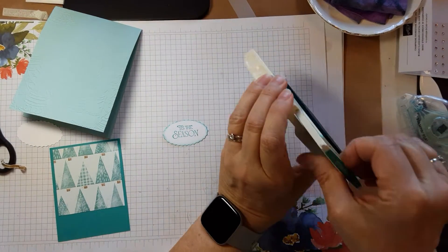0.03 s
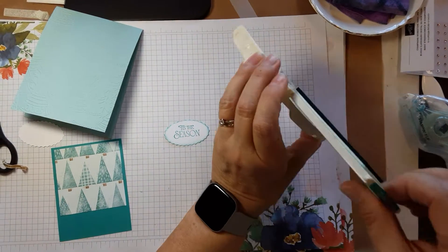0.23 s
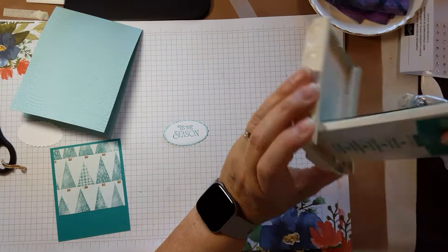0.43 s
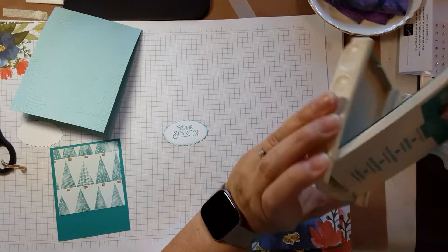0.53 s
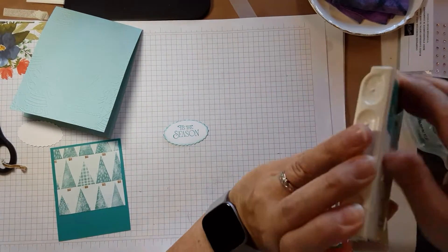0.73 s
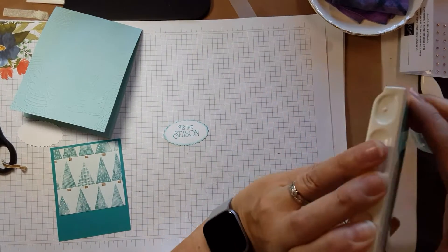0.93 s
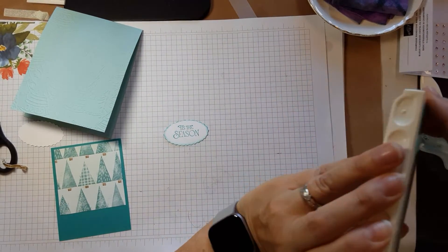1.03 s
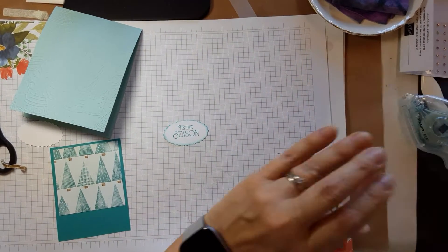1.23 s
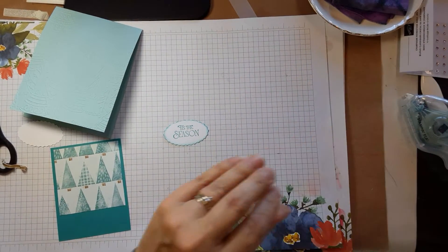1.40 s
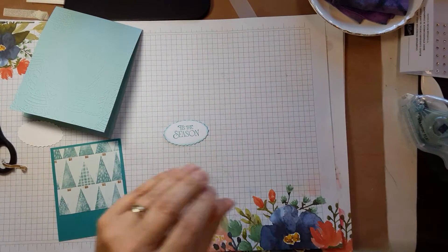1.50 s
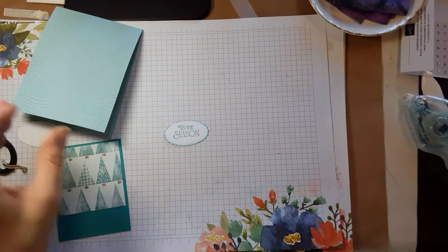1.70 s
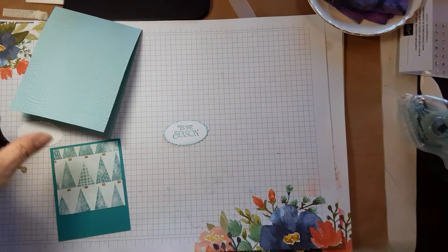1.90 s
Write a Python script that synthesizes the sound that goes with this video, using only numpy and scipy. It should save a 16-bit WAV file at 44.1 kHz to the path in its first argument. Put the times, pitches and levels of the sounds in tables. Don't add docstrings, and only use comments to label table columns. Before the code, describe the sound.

Plastic case clicking closed in hand, bright cracks close up, then a dull tabletop thud

```python
import sys
import numpy as np
from scipy import signal
from scipy.fft import rfft, irfft
from scipy.io import wavfile
from scipy.ndimage import uniform_filter1d

SR = 44100
rng = np.random.default_rng(int(sys.argv[2]) if len(sys.argv) > 2 else 0)


def to_wav(s):
    ch = np.atleast_2d(s).T
    pcm = np.round(np.clip(ch, -1, 1) * 32767)
    wavfile.write(sys.argv[1], SR, pcm.astype(np.int16))


def boost_factor(decibels):
    exponent = np.asarray(decibels, float) / 20
    return 10 ** exponent


N = 85995
LEAD = 4410


def read(points, hz):
    f, value = np.transpose(points)
    return np.interp(np.log(hz + 1), np.log(f + 1), value)


def add(mix, s, sound):
    part = mix[LEAD + round(s * SR):][:len(sound)]
    part += sound[:len(part)]


def hiss(points):
    hz = np.fft.rfftfreq(N, 1 / SR)
    x = irfft(rfft(rng.standard_normal(N)) * boost_factor(read(points, hz)), N)
    return x / x.std()


def ring(modes, t, spread, spread_db):
    luck = 2 * rng.random((len(modes), 2)) - 1
    out = 0
    for (hz, db, t60), (a, b) in zip(modes, luck):
        fade = boost_factor(db + spread_db * b - 60 * t / t60)
        out = out + fade * np.sin(2 * np.pi * hz * (1 + spread * a) * t)
    return out


# (frequency [Hz], level [dB])
PORT = [(200, -5), (900, 15), (3500, 2.5), (5500, 10.5), (6800, 2), (7800, -12.5), (9300, -15.5),
        (16000, -17)]
# (frequency [Hz], width [Hz], level [dB])
PORT_PEAKS = [(10590, 590, -4.5), (13500, 1800, -12)]


def colour(x, top_db, low_db):
    hz = abs(np.fft.fftfreq(4096, 1 / SR))
    gain = boost_factor(read(PORT, hz))
    gain = gain + sum(boost_factor(db) / (1 + (2 * (hz - f) / w) ** 2) for f, w, db in PORT_PEAKS)
    treble = top_db / (1 + (7500 / (hz + 1)) ** 8)
    bass = low_db / (1 + (hz / 1600) ** 4)
    gain = gain * boost_factor(treble + bass)
    taps = np.fft.ifft(np.exp(np.conj(signal.hilbert(np.log(gain))))).real[:1024]
    return signal.oaconvolve(x, taps)[:len(x)]


# (time [s], shell ring [dB], cavity ring [dB], wall ring [dB], crack [dB])
CASE_SNAPS = [(-.03, -36, -24, -34, -21.5), (.005, -66, -96, -67, -55), (0.0483, -46, -50.5, -42, -45),
              (0.0633, -53, -58, -46, -48), (0.1775, -35, -34.5, -43.5, -37), (0.193, -52, -53, -48, -39),
              (0.2009, -44, -24.5, -55.5, -39), (0.217, -22, -54, -18.5, -13),
              (0.2257, -28.5, -15.5, -29, -21.5), (.391, -43.5, -52.5, -64, -66),
              (0.3995, -36.5, -31, -58.5, -49), (0.4628, -30, -21.5, -29, -31),
              (0.477, -32.5, -53.5, -47, -57.5), (0.534, -44, -36, -70, -70),
              (.582, -55, -45.5, -69, -72.5), (.625, -49.5, -51, -68.5, -69),
              (0.657, -62.5, -43.5, -62.5, -68), (0.666, -55.5, -35.5, -62.5, -64.5),
              (0.6718, -41, -35, -39, -20), (.6738, -19, -15.5, -40.5, -29.5),
              (0.682, -27.5, -28.5, -17.5, -9), (.684, -20, -14, -24, -17.5),
              (0.6885, -38.5, -33, -31, -19.5), (.76, -37, -25, -41, -50),
              (0.8016, -22, -7.5, -17.5, -11.5), (0.8056, -35, -30, -15, -39.5),
              (1.122, -74, -76, -62, -55.5), (1.455, -74, -60.5, -89.5, -69.5),
              (1.542, -36.5, -41.5, -50.5, -43), (1.5802, -53, -41.5, -58.5, -37.5),
              (1.593, -62, -54, -72, -54), (1.607, -29.5, -25.5, -63, -39), (1.625, -46.5, -14, -20.5, -19),
              (1.8209, -70, -67, -78, -45)]
# (frequency [Hz], level [dB], t60 [s])
OPEN_MODES = [
    [(507, -6.5, 0.14), (650, -7, 0.14)],
    [(1046, -2, 0.029), (1360, -12.5, 0.049)],
    [(1910, -3.5, 0.086), (2215, 1, 0.035), (2950, -18, 0.013)],
]
HALF_MODES = [
    [(414.7, -3.5, .09), (470.5, -7, 0.025)],
    [(1020, -1, 0.082), (1420, -10.5, 0.11)],
    [(1830, 4, 0.016), (2150, 2, 0.028), (2520, 0, 0.0086), (3530, -1, 0.017)],
]
SHUT_MODES = [
    [(644, 0.66, 0.016), (750, -1.2, 0.041)],
    [(940, -5.5, 0.04), (1075, 0.5, 0.045), (1440, -7, 0.018), (1703, -8.5, 0.045)],
    [(2250, -9.5, 0.04), (3015, 2.5, 0.022), (3700, 3, 0.011), (4100, 8, 0.0071)],
]
LATCHED_MODES = [
    [(661, -8, 0.033), (776, 1.5, 0.034)],
    [(950, -10, 0.019), (1034, 1, 0.021), (1435, -8, 0.018), (1660, -6.5, 0.021)],
    [(2150, -1, 0.025), (2633, 0.68, 0.012), (4140, 1.7, 0.0049), (5174, 1.4, 0.0067)],
]
DOWN_MODES = [
    [(294, -3, 0.031), (516, 0, 0.0055)],
    [(726, 5, 0.0039), (1093, 2, 0.0093), (1490, -6, 0.013)],
    [(1877, 1, 0.028), (2320, 19, 0.0025), (3690, -9, 0.024), (3920, 5.5, 0.0018), (4630, 8, 0.0035)],
]
MOVES = [.43, .6, .676, .78, 1.5, 1.615]
CRACK_LOW = [-7, 0.5, -5.5, -8, -4, -2.5, -0.5]
PULSE_SHARP = [3.5, -6, -5.5, 8.5, 4, 10, -18]
CRACK_TOP = [-3.5, -14, -7.5, 7, 0, -7, 2.5]


def case():
    t = np.arange(round(.1 * SR)) / SR
    near = np.zeros(N + LEAD)
    sent = np.zeros((len(MOVES) + 1, N + LEAD))
    states = (OPEN_MODES, HALF_MODES, SHUT_MODES, LATCHED_MODES, DOWN_MODES)
    for s, shell_db, cavity_db, wall_db, crack_db in CASE_SNAPS:
        state = states[np.searchsorted([.43, .6, .78, 1.5], s)]
        place = np.searchsorted(MOVES, s)
        shell, cavity, wall = (-boost_factor(db) * ring(part, t, .008, 1) * np.minimum(t / 0.0008, 1)
                               for db, part in zip((shell_db, cavity_db, wall_db), state))
        held = shell * np.exp(-(t / .03) ** 2) + (cavity + wall) * np.exp(-(t / .015) ** 2)
        body = shell + boost_factor(-7) * cavity + wall

        grit = rng.standard_normal((len(t), 2))
        snap = grit[:, 0] * boost_factor(-60 * t / 0.0052)
        rattle = grit[:, 1] * boost_factor(-12 - 60 * t / 0.044)
        crackle = boost_factor(2.5) * (snap + rattle) * np.minimum(t / 0.000096, 1)
        click = 1. * (np.arange(len(t)) == 12)
        pulse = -colour(click, CRACK_TOP[place], CRACK_LOW[place])
        crack = colour(crackle, CRACK_TOP[place], CRACK_LOW[place])
        crack = crack + boost_factor(2 + PULSE_SHARP[place]) * pulse

        add(near, s, held + boost_factor(crack_db) * crack)
        add(sent[place], s, boost_factor(7.5) * body * np.exp(-t / .002) + boost_factor(crack_db + 13.5) * pulse)
    small = signal.butter(3, 300, "high", fs=SR, output="sos")
    return signal.sosfilt(small, near), signal.sosfilt(small, sent)


# (delay [s], level [dB])
MORE_ECHOES = [(0.027, -21.5), (0.014, -5), (0.016, -19), (0.024, -29), (0.032, -17)]


def echoes(x):
    thin = x - .7 * signal.sosfilt(signal.butter(1, 1500, fs=SR, output="sos"), x)
    out = np.zeros(len(x))
    ceiling = (.0142, -9)  # s, dB
    for k, (s, db) in enumerate([ceiling] + list(MORE_ECHOES)):
        delay = round(s * SR)
        out[delay:] += (-1) ** k * boost_factor(db) * thin[:-delay]
    return out


# (frequency [Hz], t60 [s])
ROOM_DECAY = [(100, 0.13), (300, 0.38), (700, 0.5), (2000, 0.46), (6000, 0.51), (9000, 0.33), (15000, 0.42)]
# (frequency [Hz], level [dB])
ROOM_TONE = [(150, 1.5), (500, -4.5), (1500, 0.5), (4000, -4), (8000, 3.5), (15000, -4.5)]


def room(x, wet_db):
    taps = np.zeros(SR)
    at = np.arange(0, SR - 20, 10) + rng.integers(0, 10, (SR - 11) // 10)
    taps[at] = rng.choice([-1., 1.], at.shape)
    hz, t, z = signal.stft(taps, SR, nperseg=256)
    fade_db = read(ROOM_TONE, hz)[:, None] - 60 * t / read(ROOM_DECAY, hz)[:, None]
    tail = signal.istft(z * boost_factor(fade_db), SR, nperseg=256)[1]
    tail = tail * np.clip(np.arange(len(tail)) / SR / 0.016, 0, 1) ** 2
    return signal.fftconvolve(x, boost_factor(wet_db) * tail / np.linalg.norm(tail))[:len(x)]


# (frequency [Hz], level [dB per Hz])
HUSH = [(30, -1.5), (250, -6.5), (1400, -16.5), (2600, -37), (5600, -21.5), (8500, -43.5), (10500, -36.5),
        (16000, -33.5)]
HUM_HZ, HUM_WIDTH_HZ = 55.6, 16


def floor():
    low, high = HUM_HZ - 2 * HUM_WIDTH_HZ, HUM_HZ + 2 * HUM_WIDTH_HZ
    hum = hiss([(low, -30), (HUM_HZ, 0), (high, -30), (300, -80)])
    return boost_factor(-64.5) * hiss(HUSH) + boost_factor(-71.5) * hum


# (time [s], level [dB])
SLIDE_LEVEL = [(0, -48), (.12, -56), (.3, -44), (.42, -62), (.6, -71), (.66, -64.5), (.7, -89)]
# (time [s], level [dB])
RUB_LEVEL = [(.1, -75), (.17, -57), (.24, -44), (.34, -58.5), (.44, -64.5), (.49, -56), (.6, -62),
             (.66, -61.5), (.7, -85)]
# (frequency [Hz], width [Hz], level [dB])
HOLLOW_MODES = [(448, 18, -2), (993, 50, -9.5)]
# (time [s], level [dB])
LINGER_LEVEL = [(.22, -48), (.29, -61), (.345, -51.5), (.38, -77), (.44, -53)]
# (time [s], level [dB])
SLEEVE_LEVEL = [(1.12, -83.5), (1.22, -67.5), (1.33, -65.5), (1.43, -73), (1.5, -78)]
# (frequency [Hz], level [dB])
SLEEVE_TONE = [(300, -6.5), (1000, -9), (1900, 1.5), (2500, -15.5), (3700, -10.5), (5500, -12.5),
               (8000, -30.5)]


def narrow(hz, w):
    return hiss([(hz - 4 * w, -40), (hz - w, -12), (hz, 0), (hz + w, -12), (hz + 4 * w, -40)])


def hands():
    t = np.arange(N) / SR

    def level(curve):
        return boost_factor(np.interp(t, *np.transpose(curve), left=-120, right=-120))

    grain_db = 1.7 * uniform_filter1d(rng.standard_normal(N), size=300) * np.sqrt(300)
    slide = hiss([(250, -17), (480, 3), (700, 2.5), (1010, -1.5), (1400, -4), (2200, -1.0),
                  (5500, -8.5), (8000, -27)])
    hollow = sum(boost_factor(db) * narrow(hz, w) for hz, w, db in HOLLOW_MODES)
    plastic = level(RUB_LEVEL) * hollow + level(LINGER_LEVEL) * narrow(2240, 42) + level(SLIDE_LEVEL) * slide
    sleeve = level(SLEEVE_LEVEL) * hiss(SLEEVE_TONE)
    return boost_factor(grain_db) * (plastic + sleeve)


# (time [s], strength [dB], upper boards [dB], middle boards [dB])
TABLE_BLOWS = [(0.021, -18.5, -24.5, -32), (0.03, -12, -19.5, -20), (0.223, -23.5, -19, -14),
               (0.261, -35, -15, -2.5), (0.458, -53, -12, -3), (.682, -43.5, 12, 7), (0.749, -48.5, 6, 8.5),
               (.8, -54, -6, 16), (1.555, -52, -13.5, -13), (1.582, -41.5, 9.5, 5), (1.606, -26, 8.5, 4),
               (1.6245, -12.5, 13.5, 7.5), (1.6388, -23, 14, 6), (1.658, -28, 10, 18),
               (1.706, -33, 10, 14.5), (1.74, -27, 10.5, 8), (1.775, -34, 12.5, -3.5),
               (1.849, -44.5, 15.5, -9)]
# (frequency [Hz], level [dB], t60 [s])
LOW_BOARDS = [(89, 5.5, 0.18), (103, 9.5, 0.11)]
# (frequency [Hz], level [dB], t60 [s])
BOARDS = [(148, -3.5, 0.15), (166.2, -2, 0.17), (225.6, 1.5, 0.074), (297, -7, 0.06), (350.7, -7.5, 0.055),
          (494, -13, 0.067)]


def table():
    t = np.arange(round(.4 * SR)) / SR
    out = np.zeros(N + LEAD)
    for s, db, high_db, middle_db in TABLE_BLOWS:
        top = boost_factor(-22.5) * ring(LOW_BOARDS, t, .01, 0.48)
        top = top + boost_factor(middle_db) * ring(BOARDS[:2], t, 0.022, 0.74)
        top = top + boost_factor(high_db) * ring(BOARDS[2:], t, 0.016, 0.42)
        add(out, s, -boost_factor(db - 16.0) * top * np.minimum(t / 0.0011, 1))
    return signal.sosfilt(signal.butter(4, 78, "high", fs=SR, output="sos"), out)


PLACE_ECHO = [-8, -0.5, -3, -10.5, -6.5, -9.5, -16]
PLACE_TAIL = [0, 2, 2, 0, -2.5, 10, -1.5]


def scene():
    near, sent = case()
    knocks = table()
    place = np.searchsorted(MOVES, (np.arange(N + LEAD) - LEAD) / SR)
    hits = near + echoes(near * boost_factor(PLACE_ECHO)[place])
    hits = hits + knocks + room(knocks, -5)
    hits = hits + sum(room(part, -5 + db) for part, db in zip(sent, PLACE_TAIL))
    return (hits[LEAD:] + hands() + floor())[None]


def top_cut(x):
    return signal.sosfilt(signal.butter(12, 17060, fs=SR, output="sos"), x)


def record(dry):
    limit = .85
    cut = limit * np.tanh(dry / limit)
    cut = signal.sosfilt(signal.butter(4, 52, "high", fs=SR, output="sos"), cut)
    above = signal.firwin(255, 16000, pass_zero=False, fs=SR)[None]
    cut = cut - boost_factor(0.5) * signal.oaconvolve(cut, above, "same")
    edge = signal.firwin(255, 16800, window=("kaiser", 9), fs=SR)[None]
    cut = signal.oaconvolve(cut, edge, "same")
    return top_cut(cut)


dry = scene()
out = record(dry)
to_wav(out)
```